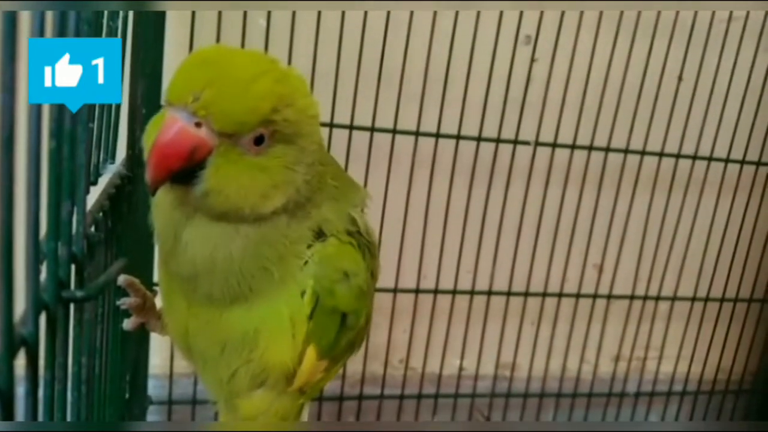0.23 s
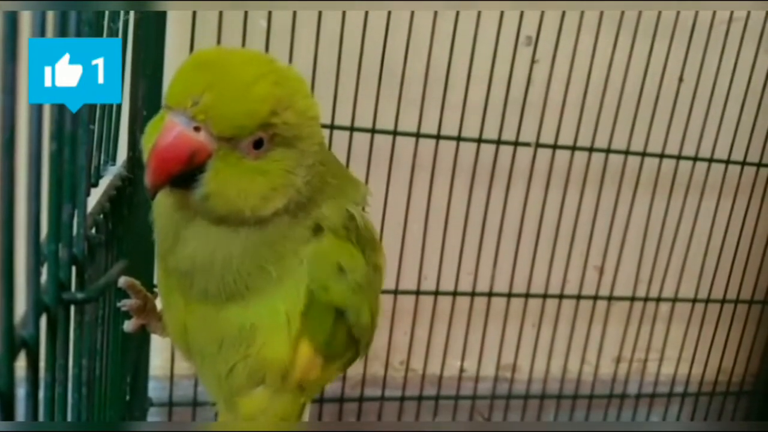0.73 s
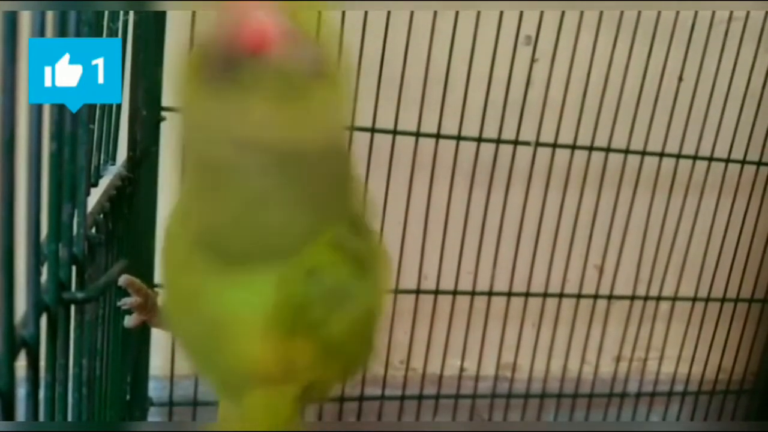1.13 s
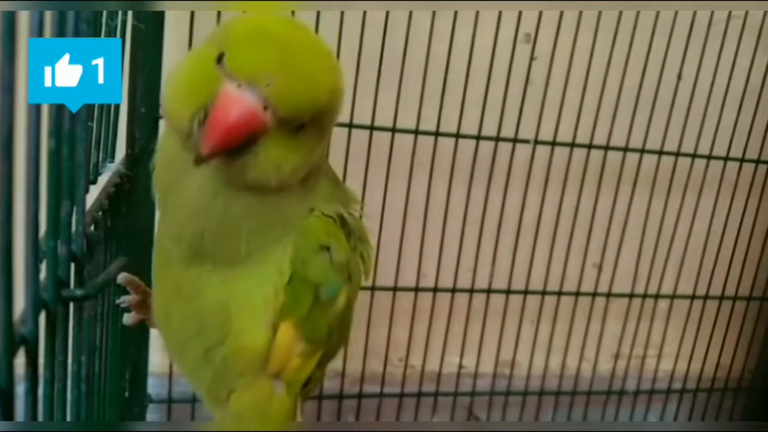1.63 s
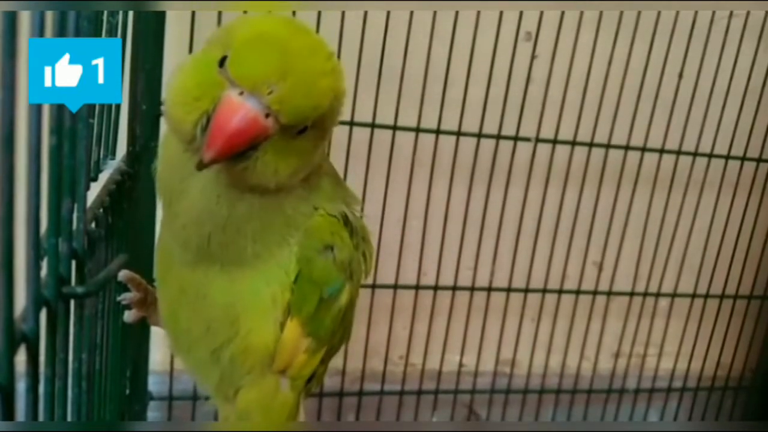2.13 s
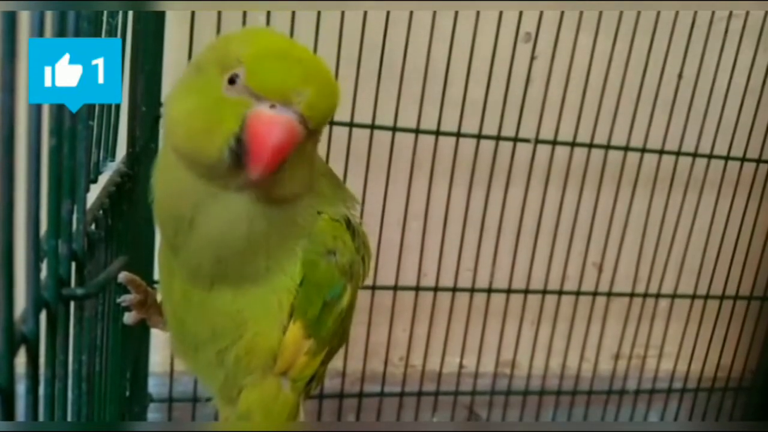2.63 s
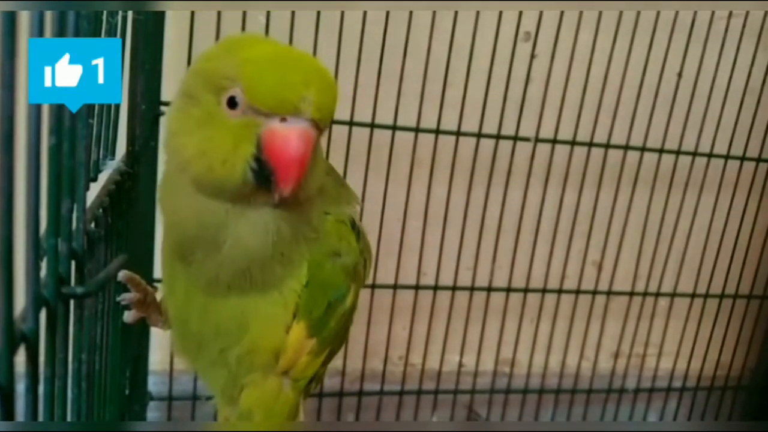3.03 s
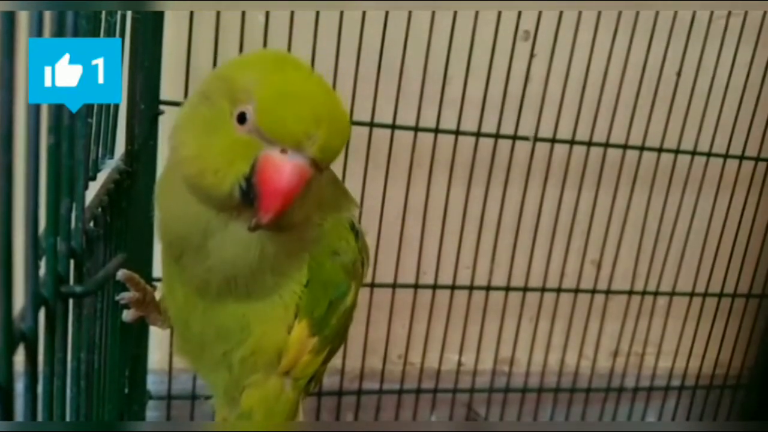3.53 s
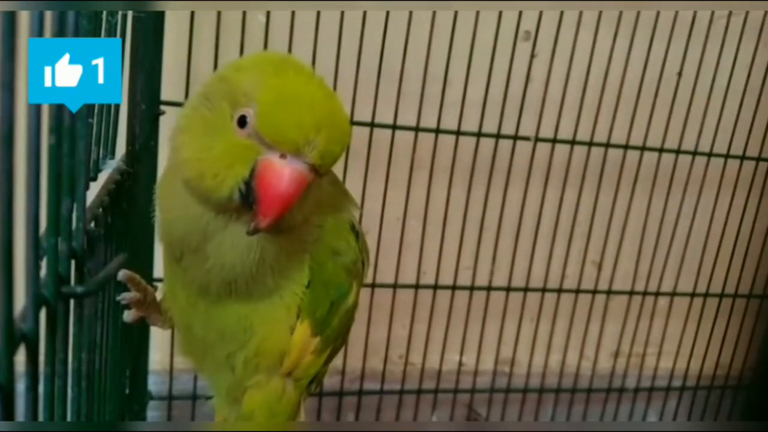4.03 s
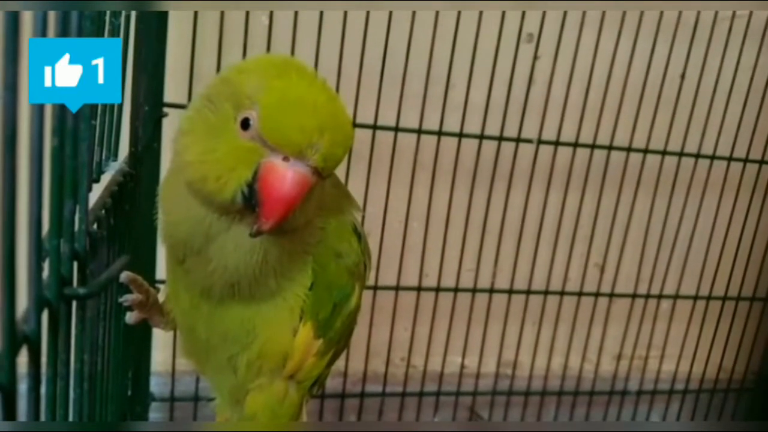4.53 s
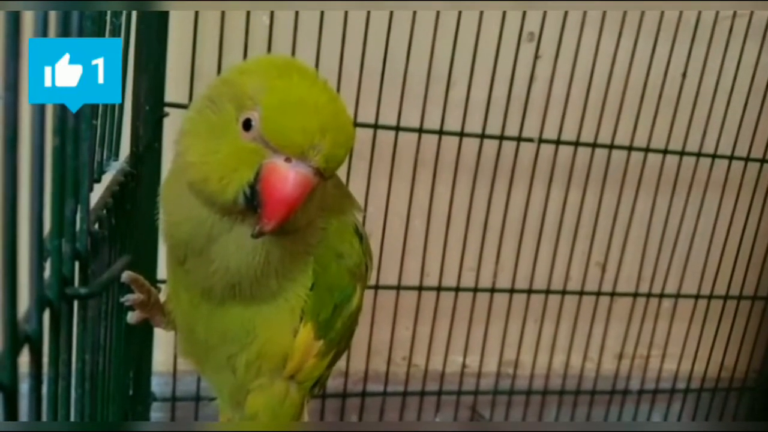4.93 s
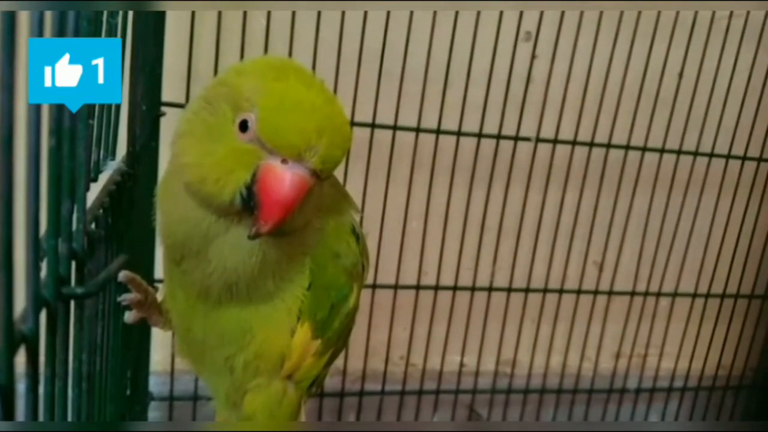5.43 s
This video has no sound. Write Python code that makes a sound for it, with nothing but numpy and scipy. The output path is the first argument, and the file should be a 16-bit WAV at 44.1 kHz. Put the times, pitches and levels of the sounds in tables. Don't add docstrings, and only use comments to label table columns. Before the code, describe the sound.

A parakeet close to the microphone, slightly left, gives a long buzzing squawk, quick yaps, a croak and a falling cry, then a row of hollow tongue clucks and later sharp beak snaps. Farther right, a small songbird trills and whistles in a ringing, hard-walled space over low hum.

```python
import sys
import numpy as np
from scipy import signal
from scipy.io import wavfile
from scipy.ndimage import uniform_filter1d

SR = 44100
rng = np.random.default_rng(int(sys.argv[2]) if len(sys.argv) > 2 else 0)


def materialize(psi):
    bounded = np.clip(np.atleast_2d(psi).T, -1, 1)
    quanta = np.round(bounded * 32767).astype(np.int16)
    wavfile.write(sys.argv[1], SR, quanta)


def gain_from_db(level_db):
    decades = np.asarray(level_db, float) / 20
    return 10 ** decades


N = 250929

TOP_HZ = 16000


def pan(x, db, lead=0):
    return np.array([x * gain_from_db(db / 2), np.roll(x, lead) * gain_from_db(-db / 2)])


def band(x, lo_hz, hi_hz, order=3):
    return signal.sosfiltfilt(signal.butter(order, [lo_hz, min(hi_hz, .45 * SR)], "band", fs=SR, output="sos"), x)


def colour(x, points, lo_hz=1., hi_hz=20000.):
    hz, db = np.transpose(points)
    f = np.maximum(np.fft.rfftfreq(1024, 1 / SR), 1)
    log_gain = np.log(gain_from_db(np.interp(np.log(f), np.log(hz), db)))
    cepstrum = np.fft.irfft(log_gain)
    cepstrum[1:512] *= 2
    cepstrum[513:] = 0
    response = np.fft.irfft(np.exp(np.fft.rfft(cepstrum)))
    return band(signal.fftconvolve(x, response)[:len(x)], lo_hz, hi_hz)


def unit(x):
    return x / np.sqrt(np.mean(x ** 2))


def drift(count, size):
    return unit(uniform_filter1d(uniform_filter1d(rng.standard_normal(count), size=size), size=size))


def add(out, x, s):
    i = int(s * SR)
    out[..., i:i + x.shape[-1]] += x[..., :N - i]


def fade(count, ramp_s):
    edge = np.minimum(np.arange(count), np.arange(count)[::-1]) / (ramp_s * SR)
    return np.sin(np.pi / 2 * np.clip(edge, 0, 1)) ** 2


def follow(table, t, soften=300):
    s, *columns = np.transpose(table)
    return [uniform_filter1d(np.interp(t, s, c), size=soften, mode="nearest") for c in columns]


def room(x, t60, gap_s, wet_db, sparse):
    t = np.arange(int(1.6 * SR)) / SR
    scatter = gain_from_db(sparse * rng.exponential(size=len(t)) * np.exp(-t / 0.2))
    tail = rng.standard_normal((2, len(t))) * scatter * gain_from_db(-60 * t / t60) * (t > gap_s)
    tail /= np.sqrt(np.sum(tail ** 2) / 2)
    return gain_from_db(wet_db) * signal.fftconvolve(x[None], tail)[:, :N]


def hum():
    # pitch_hz, level_db (per Hz)
    hum_curve = [(25, -22.5), (45, -13), (61, 1), (82, -11), (115, 2), (160, -0.5), (240, -13.5),
                 (316, -4.5), (500, -15.5), (860, -8), (1780, -16.5), (4500, -22.5), (6500, -36.5),
                 (15800, -48.5)]
    curve_hz, curve_db = np.transpose(hum_curve)
    f = np.maximum(np.fft.rfftfreq(N, 1 / SR), 1)
    gain = gain_from_db(np.interp(np.log(f), np.log(curve_hz), curve_db))
    mid, side = np.fft.rfft(rng.standard_normal((2, N))) * gain
    side = side * np.clip(0.077 * (f / 100) ** 0.71, 0, 1)
    return gain_from_db(-41.5) * unit(np.fft.irfft(np.array([mid + side, mid - side]), N))


def trills():
    # start_s, length_s, start_hz, end_hz, level_db
    warbles = [(.73, 0.084, 4830, 4840, -32), (.9, 0.11, 6170, 7000, -43), (.962, .12, 5000, 5200, -26.5),
               (1.195, 0.13, 4990, 5005, -28.5)]
    # start_s, length_s, start_hz, end_hz,
    # level_db
    buzzes = [(0., 0.06, 2250, 2660, -43), (1.76, 0.12, 4060, 4400, -24.5), (2.015, 0.098, 4547, 3896, -21),
              (2.04, 0.077, 6820, 4920, -29.5), (2.245, 0.1, 5490, 4370, -28),
              (2.255, 0.045, 7120, 5570, -29.5), (2.29, .08, 4370, 3963, -16.5),
              (2.505, 0.038, 6740, 5660, -32.5), (2.53, .071, 4580, 2726, -23.5),
              (2.555, 0.053, 6250, 5730, -33), (2.707, 0.031, 5910, 5300, -28),
              (2.835, 0.028, 5910, 5400, -29.5), (2.97, 0.022, 5910, 5620, -30),
              (2.12, 0.17, 2367, 2270, -40.5), (2.35, 0.13, 2310, 2334, -40), (1.33, .2, 5850, 6080, -42.5),
              (1.6, 0.19, 5980, 5840, -39.5), (1.97, 0.12, 5200, 4460, -29.5)]
    out = np.zeros(N)
    for rows, rate_hz, depth in ((warbles, 82., 0.136), (buzzes, 181., 0.1)):
        for s, length, a_hz, b_hz, db in rows:
            count = int(length * SR)
            waver = unit(uniform_filter1d(rng.standard_normal(count), size=150))
            swing = np.cos(2 * np.pi * rate_hz * np.arange(count) / SR + 0.288 * waver)
            hz = np.linspace(a_hz, b_hz, count) * (1 + depth * swing)
            tone = np.sin(2 * np.pi * np.cumsum(hz) / SR)
            add(out, gain_from_db(db - 3.0 * swing + 0.5 * waver) * fade(count, 0.21 * length) * tone, s)
    return out


def rustles():
    # start_s, length_s, level_db
    brushes = [(0.002, 0.07, -54), (2.778, 0.043, -51), (2.95, 0.052, -54), (3.108, 0.057, -51),
               (3.918, 0.092, -45.5), (4.637, 0.048, -48.5), (5.309, 0.063, -47.5), (5.666, 0.14, -39)]
    out = np.zeros((2, N))
    for s, length, db in brushes:
        count = int(length * SR)
        grit = rng.standard_normal((2, count)) * gain_from_db(2. * rng.exponential(size=count))
        add(out, gain_from_db(db) * fade(count, 0.35 * length) * unit(band(grit, 4800.0, 9100.0, order=2)), s)
    return out


def snaps():
    # start_s, peak_db, brightness_db (per octave), left_minus_right_db
    beak_hits = [
        (0.154, -42, -5, 7),
        (0.176, -30.5, -5, 5),
        (0.209, -43, -3, -1),
        (2.701, -23, -36, -0.5),
        (4.156, -35, -3, -1),
        (4.343, -32.5, -5, -1),
        (4.733, -27, -35, 1),
        (5.063, -17.5, 0.5, 8),
        (5.463, -14.5, -2, 7),
    ]
    # pitch_hz, level_db, t60_s (time to fall 60 dB)
    horn = [(815, -5, 0.0035), (1420, -18.5, 0.0084), (2370, 10, 0.0032), (2460, -19.5, 0.13),
            (3270, -14.5, 0.039), (5200, -11.5, 0.021), (6590, -12.5, 0.015), (8020, -1, 0.0067),
            (9300, -13, 0.014), (11600, -31, 0.0064)]
    lead_in = 200
    out, t = np.zeros((2, N)), np.arange(-lead_in, 2200).clip(0) / SR
    for s, db, bright_db, side_db in beak_hits:
        low_hz = 300. if bright_db > -15 else 60.
        # delay s, level dB, added brightness dB per octave
        for lag, hit_db, tilt_db in ((-.0001, -7, 6), (.0012, 18.5, -3), (.003, 8.5, -14.5)):
            ring = np.zeros(len(t))
            for f, g, t60 in horn:
                level = gain_from_db(g + (bright_db + tilt_db) * np.log2(f / 800))
                ring += level * np.sin(2 * np.pi * f * (t + rng.random())) * gain_from_db(-60 * t / t60)
            hit = gain_from_db(db + hit_db) * ring * (1 - np.exp(-t / 0.0001))
            add(out, pan(band(hit, low_hz, TOP_HZ, order=1), side_db, lead=3), s + lag - lead_in / SR)
    return out


def clucks():
    # start_s, peak_db, ring_hz, left_minus_right_db
    tongue_hits = [(0.176, -30.5, 1330, 5), (2.658, -13.5, 1048, 5), (2.887, -11, 1053, 6.5),
                   (3.081, -35, 1170, 11), (3.108, -9.5, 1113, 4), (3.337, -7.5, 1263, 5),
                   (3.553, -9.5, 1127, 4.5)]
    out, t = np.zeros((2, N)), np.arange(1300) / SR
    swell = (t / .002) * np.exp(1 - t / .002)
    for s, db, hz, side_db in tongue_hits:
        tick = gain_from_db(-32.5) * unit(band(rng.standard_normal(len(t)), 8000.0, 13600.0, order=2))
        ring = np.sin(2 * np.pi * hz * (t + 6.1 * t ** 2))
        add(out, pan(gain_from_db(db) * swell * (ring + tick), side_db), s - .001)
    return out


def squawks():
    # time_s, pitch_hz, effort_db, throat_opening (0-1)
    long_call = [(.42, 472, -44.5, 0), (.49, 627.5, -23, 0.71), (0.519, 705.5, -22, 0.84),
                 (0.567, 737.5, -24.5, 0.89), (0.701, 708.4, -19.5, 0.88), (0.799, 695.4, -18, 0.83),
                 (0.88, 668.7, -20.5, 0.88), (0.926, 642.8, -18.5, 0.84), (0.947, 588, -27, 0.87)]
    mutter = [(1.092, 585, -35, 0.007), (1.12, 513, -28.5, 0.083), (1.14, 516.5, -27.5, 0.053),
              (1.165, 402, -29.5, 0.091), (1.186, 390, -48, .4)]
    double_yap = [(1.227, 420.4, -28, 0.93), (1.246, 523.5, -22, 0.84), (1.26, 603.4, -20, 0.86),
                  (1.287, 566, -23, 0.84), (1.309, 608.3, -19.5, 0.87), (1.322, 484, -21.5, 0.78),
                  (1.335, 460, -35, 0.68)]
    yap = [(1.407, 448, -21, 0.67), (1.421, 545.6, -22, 0.91), (1.432, 579, -19.5, 0.86),
           (1.447, 503, -24, 0.9), (1.464, 410, -28, 0.69)]
    croak = [(1.558, 302.4, -37.5, 0.69), (1.58, 322.6, -26.5, 0.81), (1.599, 413.8, -27, 1),
             (1.615, 389.2, -20.5, 0.94), (1.629, 316.5, -22, 0.91), (1.645, 277, -31.5, 0.97)]
    falling_call = [(1.783, 1246, -28, 0.59), (1.829, 1017, -22, 0.86), (1.859, 884, -21.5, 0.86),
                    (1.891, 765, -21, 0.85), (1.922, 723, -23.5, 0.88), (1.959, 686.7, -20.5, 0.81),
                    (2.0, 674.3, -26.5, 0.934), (2.036, 696, -28, 0.67), (2.067, 750, -51, 0.8)]
    calls = (long_call, mutter, double_yap, yap, croak, falling_call)
    # mouth_db, open_beak_db, beak_opening_s, hoarseness (0-1), jaw_db
    timbres = [
        (-26, -16, 0.16, 0.04, -8),
        (-26, -19, 0.0025, 0.18, -16),
        (-21, -15.5, 0.032, 0.07, -4.5),
        (-11.5, -20.5, 0.0023, 0.15, -4),
        (-16, -24, 0.035, 0.24, -1.5),
        (-11.5, -26, 0.14, 0.06, -0.5),
    ]
    skull_levels = [-44, -40, -35, -15.5, -17, -4]
    # mouth_db_per_s, jaw_db_per_s
    closing = [(12.1, 1), (50, 7), (50, 4), (150, 18), (150, 56), (95, 90.5)]
    # pitch_hz, level_db
    throat = [(250, -14.5), (700, -15), (1400, -11.5), (2200, -14), (2900, -15.5), (3600, -19.5),
              (4300, -22), (5700, -14.5), (6900, -10), (8000, -8), (9300, -0.5), (10600, -14), (12200, -13),
              (13600, -39.5), (14900, -13.5)]
    # low_hz, high_hz, left_minus_right_db, hoarseness_share
    voice_bands = [(1793, 2567, 4.5, 1.5), (422, 1556, 5, 1.4), (2510, 4650, 4, 2.5), (4800, 7050, 7, 5.7),
                   (8400, 14900, 14.5, 2.2), (5280, 6000, 2, 1.5), (7140, 8200, 18, 1.5)]
    shut_db, open_db = -33.5, 11
    out = np.zeros((2, N))
    for call, skull_db, (mouth_fade, jaw_fade), timbre in zip(calls, skull_levels, closing, timbres):
        mouth_db, beak_db, opens_s, rasp, jaw_db = timbre
        t = np.arange(call[0][0], call[-1][0], 1 / SR)
        hz, effort, opening = follow(call, t)
        chest = -shut_db - (open_db - shut_db) * opening
        db = effort - chest
        away = np.abs(t - t[np.argmax(db)])
        mouth = mouth_db - mouth_fade * away
        skull = skull_db - 262 * away
        beak_lift = -20.5 * np.clip(1 - (t - t[0]) / opens_s, 0, 1)
        high_note = np.clip(np.log2(hz / 627), 0, 1)
        jaw = jaw_db - jaw_fade * away + 0.62 * beak_lift + 16.5 * high_note

        hoarse = rasp + 0.3 * np.exp((t - t[-1]) / 0.015)
        tremor = drift(len(t), 60)
        phase = 2 * np.pi * np.cumsum(hz * (1 + 0.097 * np.abs(hoarse) * tremor)) / SR
        k = np.arange(1, 56)[:, None]
        partials = np.cos(k * phase - .12 * k ** 2)
        pulses = -unit(np.sum(partials * (k * hz < TOP_HZ), axis=0))
        breath = rng.standard_normal(len(t)) * (1 + 0.7 * np.cos(phase))

        levels = (0, chest, jaw, mouth, beak_db + beak_lift, skull, skull - 8)
        for (lo, hi, side_db, share), rel in zip(voice_bands, levels):
            grain = .45 * (hi - lo > 1500) * (4000 < lo < 6000) + .3 * (hi > 12000)
            noisy = np.clip(share * hoarse + grain, 0, 1)
            part = colour(pulses * np.sqrt(1 - noisy ** 2) + noisy * breath, throat, lo, hi)
            patchy = 3 * (lo > 4000) * drift(len(t), 500)
            part /= np.sqrt(uniform_filter1d(part ** 2, size=600))
            voice = part * gain_from_db(db + rel + patchy) * fade(len(t), 0.0061)
            add(out, pan(voice, side_db, lead=3 * (hi < 5000)), t[0])
    return out


def sung(syllable, repeats):
    return [(s + lag, length, a, c, db + rel) for s, db in repeats for lag, length, a, c, rel in syllable]


def whistle_list():
    # start_s, length_s, start_hz,
    # end_hz, level_db
    even_glides = [(2.0645, 0.0074, 5490, 5330, -27.5), (2.0695, .0081, 4360, 4770, -24),
                   (2.0785, .0061, 4510, 4160, -19.5), (2.1035, 0.011, 3770, 3440, -17),
                   (2.1145, 0.023, 3440, 2570, -24), (2.1565, .0121, 2520, 2980, -29),
                   (2.1625, 0.023, 3390, 2500, -25), (2.1775, 0.0092, 6640, 5110, -27.5),
                   (2.2915, 0.0056, 5560, 5140, -23.5), (2.3285, .0341, 3540, 2580, -24),
                   (2.3845, 0.013, 2360, 2960, -28), (2.4335, 0.014, 3236, 3840, -15.5),
                   (2.5725, 0.025, 3490, 2520, -28), (2.8065, 0.059, 3790, 2910, -26.5),
                   (3.0665, .041, 3690, 2920, -35.5), (3.1285, .0061, 2800, 3430, -29),
                   (3.1325, 0.054, 2560, 1910, -27), (3.2715, 0.023, 2915, 2030, -33),
                   (3.4775, 0.0093, 5000, 3270, -20.5), (3.5005, .0081, 4800, 3450, -20),
                   (3.5195, 0.014, 3570, 2675, -16), (3.7665, .0061, 3650, 4410, -36),
                   (3.7875, 0.0062, 4270, 3490, -33), (3.8435, .021, 6150, 5210, -47),
                   (3.8665, .0071, 4840, 5530, -45), (3.9925, 0.02, 5940, 5280, -40.5),
                   (4.0125, .0081, 4660, 5740, -49), (4.1295, 0.016, 6440, 4260, -38.5),
                   (4.2605, 0.019, 3970, 3100, -38), (4.9905, 0.017, 5140, 4380, -34.5),
                   (5.0245, .031, 3280, 2330, -29.5), (5.1425, 0.02, 4740, 3210, -33),
                   (5.1585, 0.058, 3240, 2095, -35), (5.3465, 0.03, 2630, 2160, -38),
                   (5.6605, 0.013, 5630, 4710, -44)]
    late_turns = [(3.307, 0.0306, 3450, 3200, -14.5), (3.342, .016, 3090, 1700, -21),
                  (3.486, 0.0113, 5013, 3440, -18.5), (4.034, 0.014, 5040, 4760, -34),
                  (4.152, 0.013, 4300, 6100, -35), (4.827, .012, 4290, 3630, -28),
                  (4.835, .056, 3746, 2166, -27.5), (5.298, 0.02, 4630, 2870, -30.5),
                  (5.32, 0.037, 2806, 3270, -31), (5.552, 0.0049, 5720, 4700, -45)]
    early_turns = [(3.275, 0.024, 6060, 4020, -27), (3.429, 0.021, 2280, 3110, -20.5),
                   (3.449, .009, 2900, 4500, -19), (3.457, 0.02, 4340, 4950, -16.5),
                   (3.302, 0.0079, 2660, 3440, -20), (4.175, 0.0224, 5150, 4800, -30.5),
                   (4.315, 0.025, 4030, 3230, -30), (4.793, 0.02, 4800, 5400, -42.5)]
    # start_s, length_s, edge_hz, middle_hz, level_db
    bows = [(1.147, 0.03, 7100, 6380, -29.5), (3.115, 0.017, 2760, 2794, -20.5),
            (3.892, 0.019, 5000, 5060, -40), (3.941, 0.01, 6940, 6120, -41),
            (4.282, 0.0245, 3450, 3575, -34), (4.813, 0.018, 4410, 4377, -25.5),
            (4.942, .075, 7080, 6910, -50), (5.004, 0.028, 3200, 3440, -25.5),
            (5.119, 0.0294, 3700, 4300, -34.5), (5.281, 0.025, 3770, 4310, -41.5)]
    # offset_s, length_s, start_hz, end_hz,
    # level_db
    hook = [(-.0121, 0.0088, 5280, 4080, 5), (-.0031, 0.0056, 3840, 5150, 1.5),
            (.0011, .0161, 4890, 3740, 8)]
    chirp = [(-.004, 0.0065, 3810, 4810, -12), (.003, 0.0073, 4670, 3480, 0), (.009, .022, 3720, 2750, 1.5),
             (.03, 0.0043, 2840, 1915, -9.5)]
    pickup = [(-.026, 0.013, 4900, 5500, -15)]
    drop_syllable = [(-.012, 0.007, 5220, 4400, -9.5), (0.002, 0.0117, 4514, 3168, -0.5),
                     (.013, .008, 3070, 2300, -18), (.027, 0.0122, 4140, 3090, -14.5)]
    # start_s, level_db
    chirp_times = [(2.48, -14.5), (2.617, -14.5), (2.758, -15), (2.883, -14), (3.017, -15.5)]
    drop_times = [(4.367, -28), (4.434, -24.5), (4.503, -26.5), (4.565, -25), (4.638, -25.5), (4.708, -25)]
    hook_times = [(1.3865 + k * .0713, -29.5 + k * 0.33) for k in range(7)]
    trickle = []
    for k in range(5):
        lower = 1 - k * 0.0475
        trickle.append((3.546 + k * 0.022, 0.01426, 3200 * lower, 2255 * lower, -22.5 - k * 3))
    chirps = sung(chirp, chirp_times) + sung(pickup, chirp_times[1:])
    # whistles, share of the glide done at half length, dB lost from start to end
    shapes = ((even_glides + trickle, .47, 0.5), (late_turns, 0.204, 0.5), (early_turns, .88, 0.5),
              (sung(hook, hook_times), .9, 0.5), (chirps, 0.499, 3),
              (sung(drop_syllable, drop_times), 0.686, 2))
    glides = []
    for rows, bend, sag in shapes:
        glides += [(s, length, a, a + bend * (c - a), c, db, sag) for s, length, a, c, db in rows]
    return glides + [(s, length, edge, middle, edge, db, 0.5) for s, length, edge, middle, db in bows]


def whistles():
    out = np.zeros(N)
    for s, length, a_hz, b_hz, c_hz, db, sag_db in whistle_list():
        u = np.linspace(0, 1, int((length + 0.0017) * SR))
        hz = a_hz * (1 - u) * (1 - 2 * u) + 4 * b_hz * u * (1 - u) + c_hz * u * (2 * u - 1)
        flutter = unit(band(rng.standard_normal(4000), 40, 300))[500:500 + len(u)]
        level = gain_from_db(db + sag_db * (.5 - u) + 3.2 * flutter) * fade(len(u), 0.00031 + 0.097 * length)
        add(out, level * np.sin(2 * np.pi * np.cumsum(hz) / SR), s - .001)
    return out


def peeps():
    # start_s, length_s, start_hz, end_hz, level_db
    soft_notes = [(3.729, 0.07, 653, 603, -48), (4.39, 0.084, 848, 804, -43),
                  (4.465, 0.057, 1108, 1080, -44.5), (4.605, 0.12, 1348, 1362, -48.5),
                  (4.915, 0.13, 863, 892, -50), (5.098, 0.0836, 1039, 927, -39),
                  (5.25, 0.115, 876, 840, -44)]
    out = np.zeros(N)
    for s, length, a_hz, b_hz, db in soft_notes:
        count = int(length * SR)
        waver = 1 + 0.018 * unit(uniform_filter1d(rng.standard_normal(count), size=500))
        phase = 2 * np.pi * np.cumsum(np.linspace(a_hz, b_hz, count) * waver) / SR
        tone = np.sin(phase) + 0.58 * np.sin(2 * phase) + 0.46 * np.sin(3 * phase)
        add(out, gain_from_db(db) * fade(count, 0.11 * length) * tone, s)
    return out


def scene():
    near = squawks() + clucks() + snaps()
    far = trills() + whistles() + peeps()
    near_mono = near.mean(axis=0)
    near_room = room(near_mono, t60=0.29, gap_s=0.005, wet_db=-12.5, sparse=3.86)
    far_room = room(far + gain_from_db(-36) * near_mono, t60=1.86, gap_s=0.00022, wet_db=0.0, sparse=4.11)
    left_slap = gain_from_db(-25.5) * pan(np.roll(far, int(0.057 * SR)), 2.5)
    right_slap = gain_from_db(-38.0) * pan(np.roll(far, int(0.027 * SR)), -2.)
    birds = near + pan(far, -5.0, lead=-1)
    return birds + near_room + left_slap + right_slap + far_room + rustles() + hum()


def band_limit(x):
    return signal.sosfilt(signal.butter(12, 16000, fs=SR, output="sos"), x)


def record(dry):
    knee, room_left = .6, .3
    over = np.maximum(np.abs(dry) - knee, 0)
    mix = dry - np.sign(dry) * (over - room_left * np.tanh(over / room_left))
    return band_limit(mix)


dry = scene()
out = record(dry)
materialize(out)
```